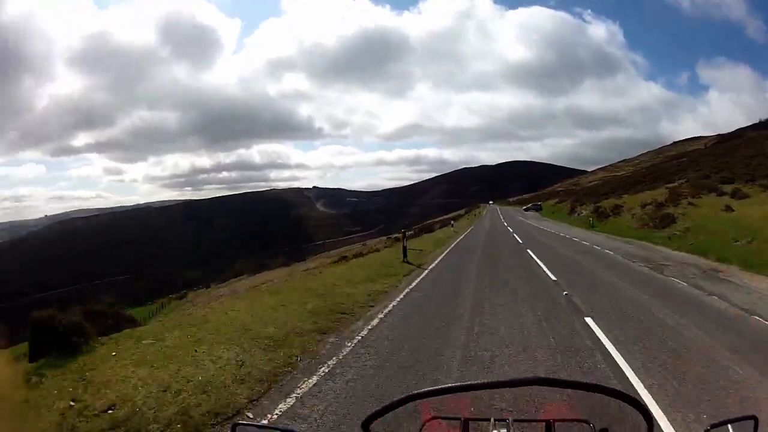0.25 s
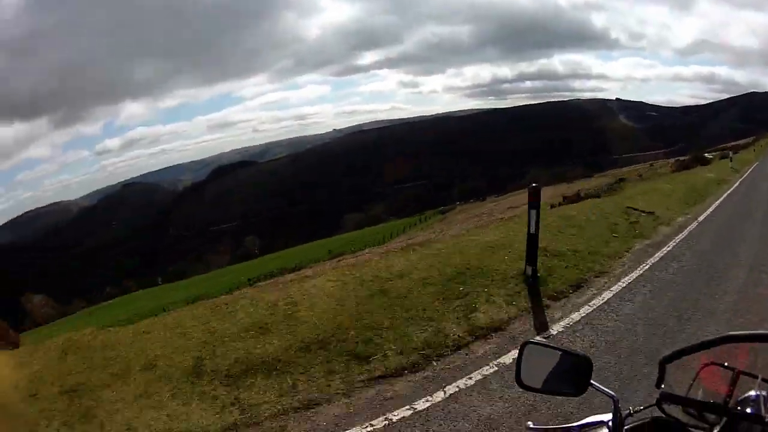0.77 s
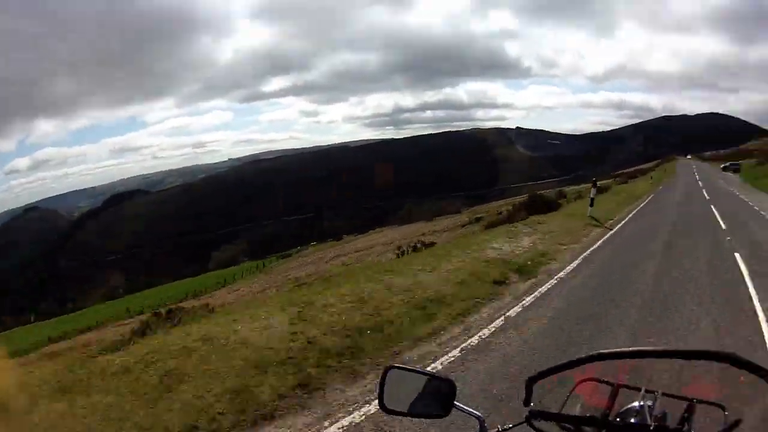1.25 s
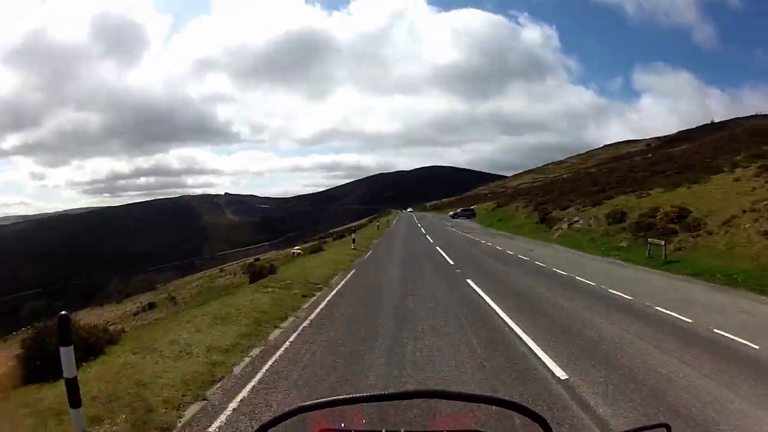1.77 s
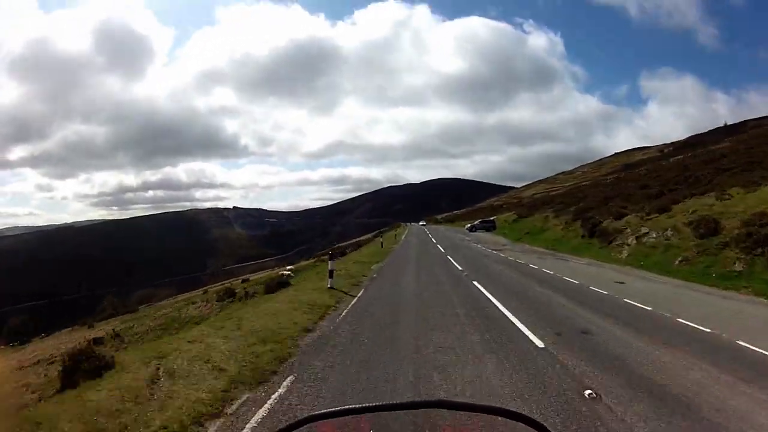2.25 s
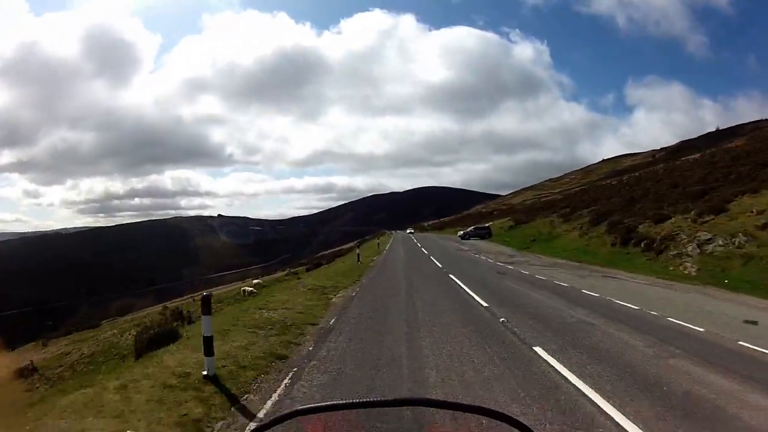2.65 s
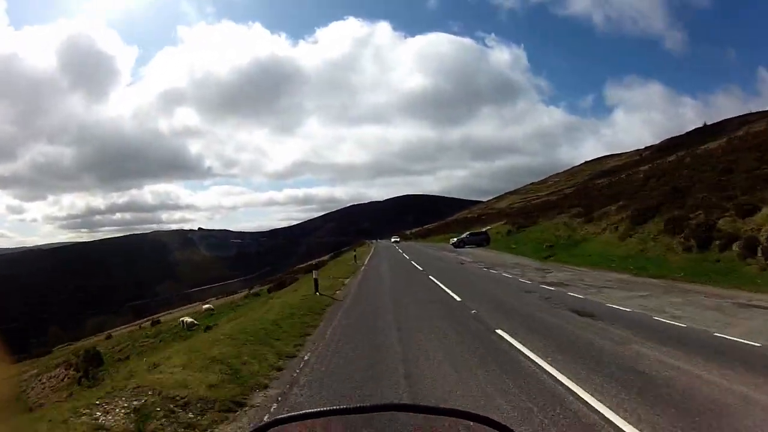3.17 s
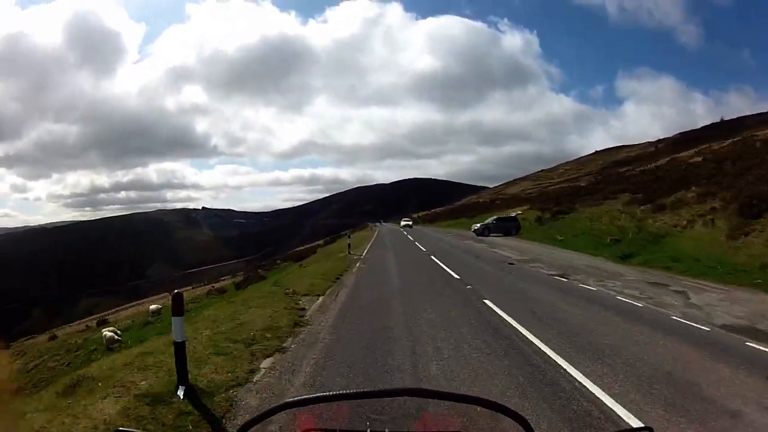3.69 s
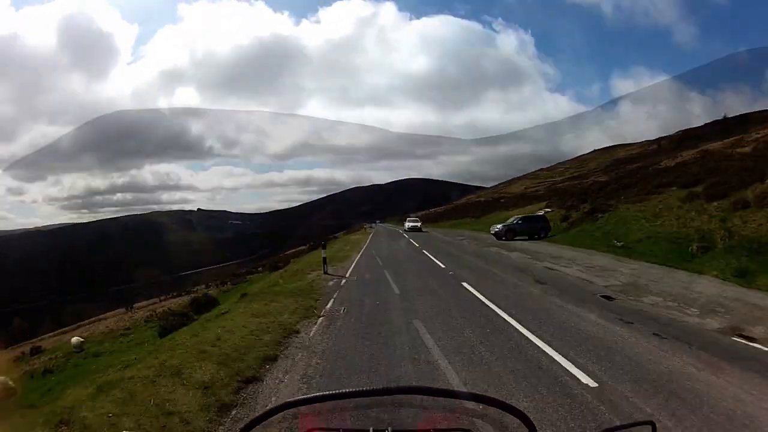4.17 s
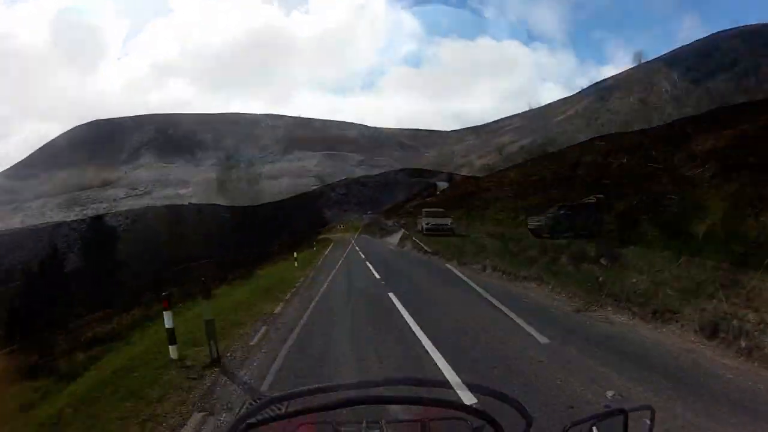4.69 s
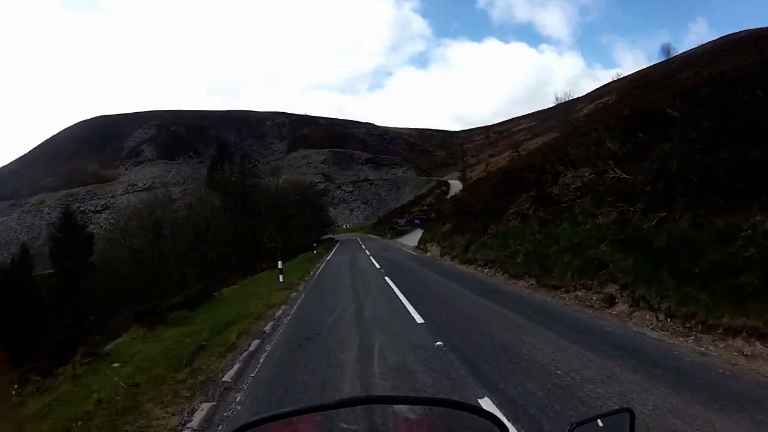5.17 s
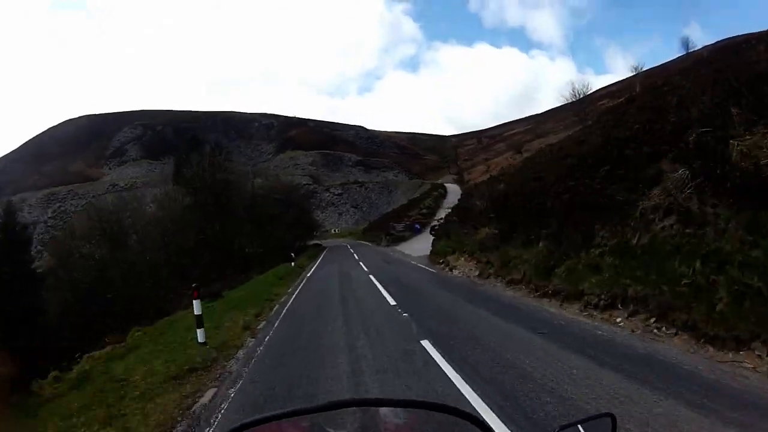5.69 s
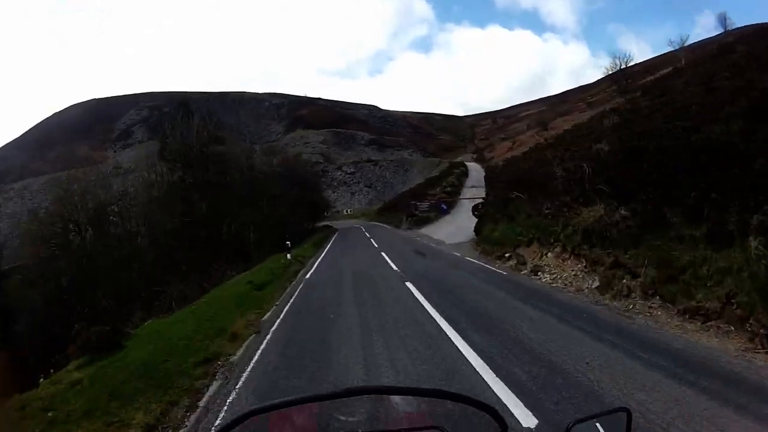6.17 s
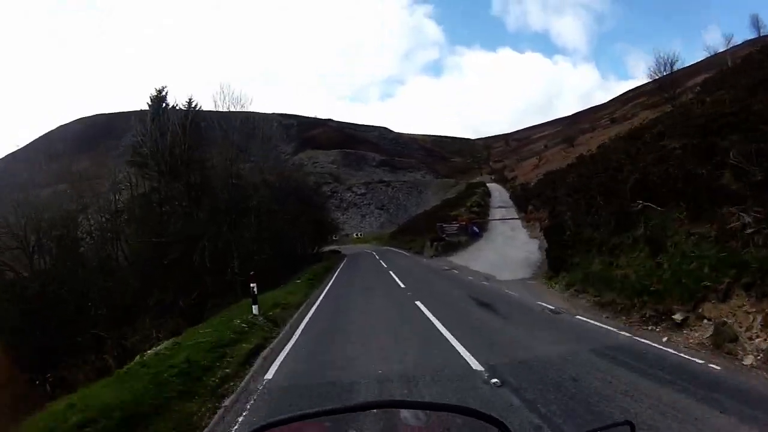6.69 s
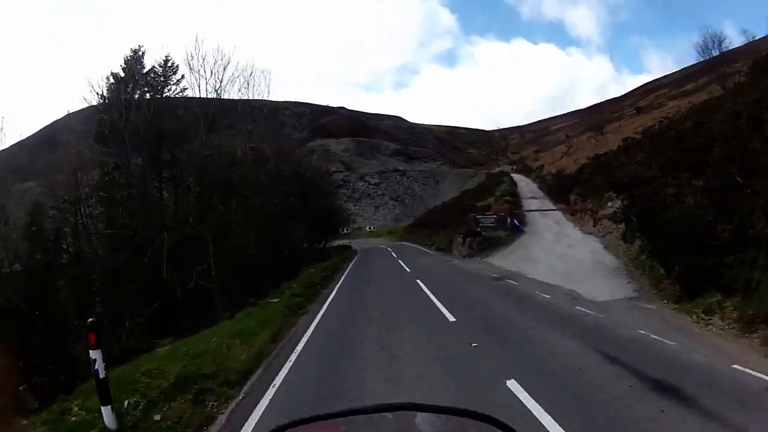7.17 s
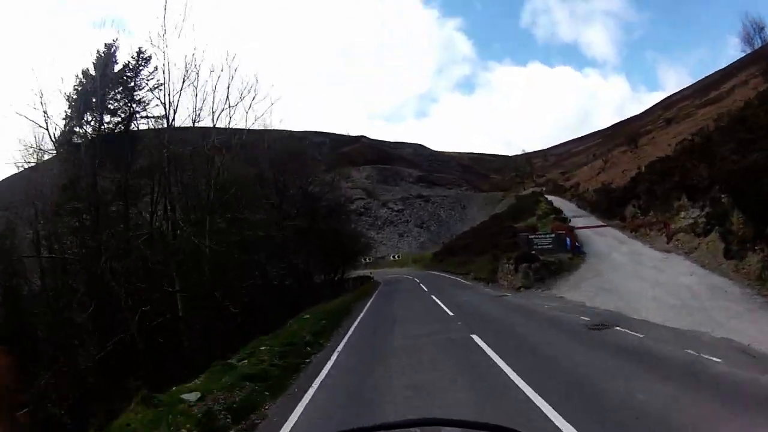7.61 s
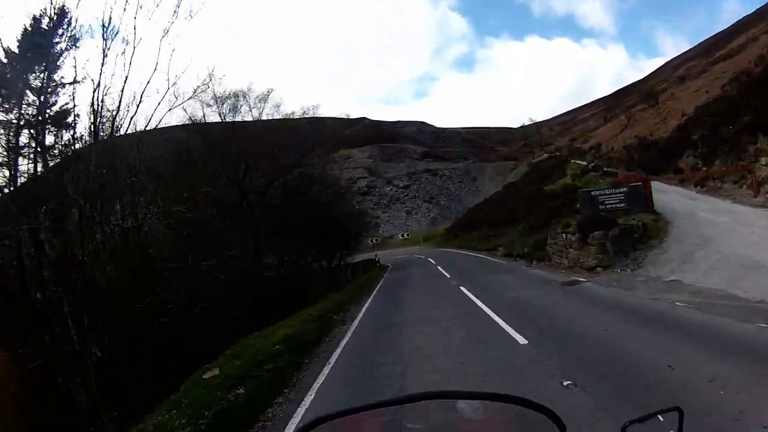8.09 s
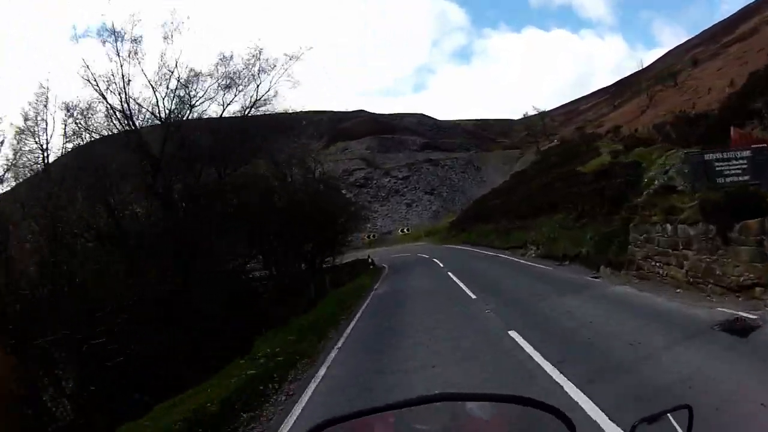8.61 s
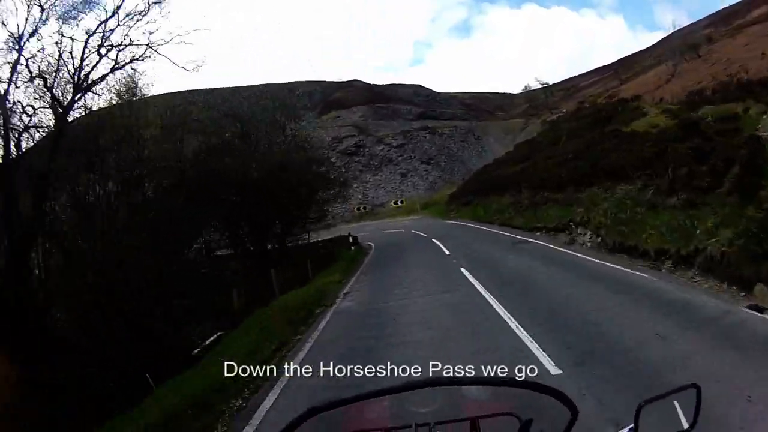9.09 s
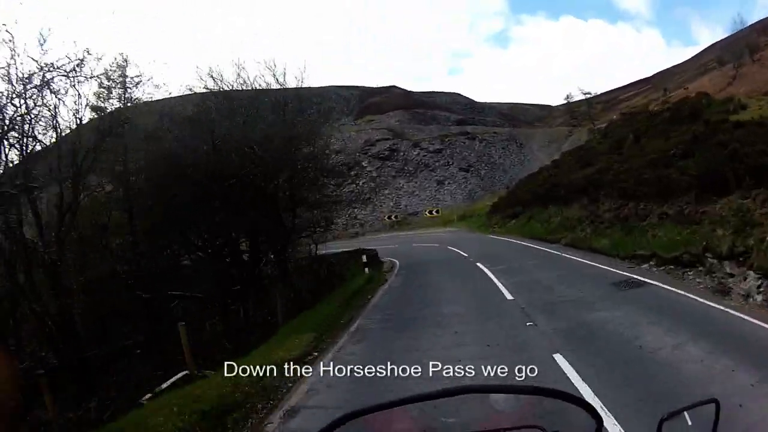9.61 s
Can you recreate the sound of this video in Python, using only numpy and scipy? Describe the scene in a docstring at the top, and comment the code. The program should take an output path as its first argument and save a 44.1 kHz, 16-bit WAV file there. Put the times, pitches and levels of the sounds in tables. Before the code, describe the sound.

Harsh, crackling wind roar over a faint steady motorcycle engine, then a quieter stretch with sparse thuds, falling engine pitch and a late rough drone.

```python
"""Wind buffets the microphone of a small camera on a motorcycle, out on an open road: pressure drives its
amplifier to a rail, where it sticks, and the sound drops out for some ms. Shaped noise makes roar and hiss.
Under it a few engine orders hum as sines on multiples of the shaft rate; late on comes a rough drone.
The camera's electronics leak a thin, pausing whine. A windy and a calm stretch overlap for half a second; short
ticks are steps in voltage. A faint noise, opposite in the two channels, follows the sound's level."""
import sys
import numpy as np
from scipy import signal
from scipy.fft import rfft, irfft
from scipy.io import wavfile

SR = 44100
rng = np.random.default_rng(int(sys.argv[2]) if len(sys.argv) > 2 else 0)


def log_audio(samples):
    """Write samples as a 16-bit WAV file to the path given in sys.argv[1]."""
    # one column per channel
    frames = np.atleast_2d(samples).T
    # limit to full scale, then quantise
    limited = np.clip(frames, -1, 1)
    pcm = np.round(limited * 32767).astype(np.int16)
    wavfile.write(sys.argv[1], SR, pcm)


def makeup_ratio(level_db):
    """Linear amplitude ratio for a level in decibels (20 dB per factor of ten)."""
    decades = np.asarray(level_db, float) / 20
    return 10 ** decades


N = 434385
CALM_STARTS_S, WINDY_ENDS_S = 4.4945, 5.004
RAIL = 1.09  # where the microphone amplifier sticks, before its low cut

# Buffets at set times that pin the microphone amplifier. Each row: start in seconds, hold in ms (ended
# early if another buffet follows sooner), rail (+1 upper, -1 lower).
PINNED = [(0.0073, 13.4, 1), (0.0461, 12.8, -1), (0.1281, 13.2, -1), (0.1644, 13.1, 1), (0.1994, 21.8, -1),
          (0.2227, 24.7, 1), (0.2567, 9.0, -1), (0.3391, 17.1, -1), (0.3862, 7.2, 1), (0.4224, 9.6, 1),
          (0.4662, 9.2, -1), (0.5575, 12.9, 1), (0.5889, 14.0, -1), (0.6059, 10.7, 1), (0.617, 2.0, 1),
          (0.6237, 3.7, 1), (0.632, 12.1, -1), (0.6493, 8.8, -1), (0.6631, 11.9, 1), (0.6757, 7.5, 1),
          (0.6847, 18.4, -1), (0.7043, 13.4, 1), (0.719, 2.2, 1), (0.7232, 3.4, 1), (0.7344, 2.0, 1),
          (0.7443, 2.6, -1), (0.7518, 2.1, -1), (0.7576, 2.0, -1), (0.7778, 5.0, 1), (0.7848, 9.1, -1),
          (0.816, 2.4, 1), (0.8236, 3.6, 1), (0.8685, 9.0, 1), (0.8818, 19.5, -1), (0.9042, 8.0, 1),
          (0.9145, 6.5, 1), (0.9475, 5.5, 1), (1.1015, 12.1, 1), (1.1161, 16.5, -1), (1.1586, 12.5, 1),
          (1.1996, 9.6, 1), (1.2453, 7.6, -1), (1.3449, 10.5, -1), (1.3611, 11.4, 1), (1.3795, 7.3, -1),
          (1.4209, 7.9, 1), (1.4658, 8.3, 1), (1.5213, 13.7, -1), (1.558, 12.7, 1), (1.6011, 11.9, -1),
          (1.6545, 14.5, 1), (1.6707, 17.2, 1), (1.6924, 10.8, -1), (1.7228, 8.8, -1), (1.7548, 8.0, 1),
          (1.7908, 12.0, -1), (1.8071, 7.4, 1), (1.8363, 10.3, 1), (1.8506, 9.7, -1), (1.8759, 9.3, -1),
          (1.8996, 9.7, 1), (1.9261, 20.3, 1), (1.9505, 17.8, -1), (2.0208, 12.9, -1), (2.0472, 10.2, 1),
          (2.0589, 14.6, -1), (2.1537, 13.0, 1), (2.2576, 17.7, -1), (2.2791, 14.1, 1), (2.308, 8.1, -1),
          (2.3333, 15.7, 1), (2.3557, 13.1, -1), (2.3793, 9.5, 1), (2.3955, 12.7, -1), (2.4251, 15.6, 1),
          (2.4468, 17.1, -1), (2.6379, 13.0, -1), (2.6796, 11.6, 1), (2.701, 12.5, -1), (2.8021, 17.3, 1),
          (2.8269, 20.3, -1), (2.8501, 15.0, 1), (2.8737, 10.3, -1), (2.8888, 18.7, 1), (2.911, 18.2, -1),
          (2.9314, 16.4, 1), (2.9602, 8.2, -1), (2.9782, 10.8, 1), (3.0015, 8.5, -1), (3.0359, 7.5, -1),
          (3.0512, 14.1, 1), (3.0807, 9.8, -1), (3.4278, 15.6, -1), (3.5997, 13.8, -1), (3.6168, 14.7, 1),
          (3.763, 7.7, -1), (3.8192, 7.4, 1), (3.8581, 13.9, -1), (3.9283, 8.9, 1), (4.0771, 8.5, 1),
          (4.1244, 16.3, -1), (4.2449, 8.0, -1), (4.3056, 8.6, -1), (5.0585, 7.7, 1), (5.0813, 15.4, -1),
          (6.0368, 9.6, -1), (6.1329, 9.5, 1), (6.1595, 17.6, -1), (6.2811, 7.3, -1), (6.3428, 14.5, -1),
          (6.4162, 7.4, -1), (6.4763, 16.6, -1), (6.7989, 21.6, -1), (7.5964, 10.4, -1), (7.6254, 10.0, 1),
          (7.6581, 13.6, -1), (8.1639, 7.6, -1), (8.9254, 10.8, -1), (9.2419, 8.2, -1), (9.4784, 8.0, -1)]


def all_holds(buffet, from_s, to_s):
    """Brief holds fall by chance between the listed ones, oftener in strong buffeting; rows as in PINNED."""
    spacing_s, rate_per_s, power = 0.024, 30.0, 3.0  # rate at a buffet level of 0 dB, before the clearance
    shortest_ms, longest_ms, clear_ms = 1.8, 5.5, 6.0
    pinned = np.array(PINNED)
    pinned = pinned[(pinned[:, 0] >= from_s) & (pinned[:, 0] < to_s)]
    chance = rng.random((int(N / SR / spacing_s), 4))
    start = (np.arange(len(chance)) + 0.5 * chance[:, 0]) * spacing_s
    hold_ms = shortest_ms + (longest_ms - shortest_ms) * chance[:, 1]
    rail = np.sign(chance[:, 3] - 0.5)
    buffet_db = np.interp(start, *np.transpose(buffet))
    happens = chance[:, 2] < rate_per_s * spacing_s * makeup_ratio(power * buffet_db)
    after = start[:, None] - pinned[:, 0] - (pinned[:, 1] + clear_ms) / 1000 > 0
    before = pinned[:, 0] - start[:, None] - (hold_ms[:, None] + clear_ms) / 1000 > 0
    clear = np.all(after | before, axis=1)
    brief = np.c_[start, hold_ms, rail][happens & clear]
    holds = np.vstack([pinned, brief])
    return holds[np.argsort(holds[:, 0])]


def big_buffets(holds, swing_s, overshoot, edge_s):
    """Pressure that passes a rail for each hold; also the time to the nearest hold, up to swing_s."""
    start, hold_ms, rail = np.transpose(holds)
    following = np.append(start[1:], start[-1] + 1)
    end = np.minimum(start + hold_ms / 1000, following - 0.0008)
    rail = RAIL * np.sign(rail)
    half_gap = np.minimum((following - end) / 2, swing_s)
    # close holds are joined by one swing
    between = (rail + np.roll(rail, -1)) / 2 * (1 - half_gap / swing_s)
    lead = np.roll(half_gap, 1)
    edge_s = np.minimum(edge_s, (end - start) / 2)
    times = np.ravel([start - lead, start, start + edge_s, end - edge_s, end, end + half_gap], "F")
    # the pressure arrives and lets go with a jerk
    crest = overshoot * rail
    pressure = [np.roll(between, 1), 0.83 * rail, crest, crest, 0.85 * rail, between]
    away = [lead, 0 * end, 0 * end, 0 * end, 0 * end, half_gap]
    return [np.interp(np.arange(N) / SR, times, np.ravel(v, "F")) for v in (pressure, away)]


def lesser_buffets(buffet_db, top_hz, nearness):
    """Low noise, softly limited so that it only grazes the rails, fading out towards each hold."""
    small = makeup_ratio(buffet_db) * band_noise([9.0, top_hz])
    return 1.06 * np.tanh(small / 0.83) * np.clip(nearness, 0, 1)


# Low turbulence right at the microphone. Each row: frequency in Hz, relative density in dB per Hz.
ROAR = [(24, 21), (55, 11.5), (100, 10.5), (190, 3), (320, -0.5), (600, -7), (1000, -17.5), (1300, -23.5),
        (1700, -29.5), (2500, -45)]


def wind_roar(roar_db, lumpy_db, flutter):
    """Low-pitched noise whose bands swell separately while shared eddies shake the whole."""
    return makeup_ratio(roar_db + 5.5) * coloured(ROAR, patchy_db=lumpy_db, rate=11.8) * flutter


# Treble of the turbulence at the microphone. Each row: frequency in Hz, relative density in dB per Hz.
HISS = [(2000, 11.5), (3000, 6.5), (3800, 5.5), (5000, 0.5), (9000, -1.5), (11500, -6.5), (14200, -6),
        (15300, -8)]


def wind_hiss(hiss_db, flutter):
    """Treble noise shaken by the same eddies as the roar."""
    return makeup_ratio(hiss_db) * coloured(HISS, patchy_db=1.24, rate=9.0) * flutter


# Band of the rumble under the buffets: lower and upper edge in Hz.
RUMBLE_HZ = 21.0, 105.3


def rumble(level_db):
    """Band noise that follows the strength of the buffets."""
    return makeup_ratio(level_db) * band_noise(RUMBLE_HZ)


# Short swells of the wind noise, some with a brighter hiss. Each row: peak in seconds, roar change in dB,
# hiss change in dB, fade in seconds.
SWELLS = [(4.975, 4.5, 3.5, 0.03), (5.215, 7.5, 4, 0.018), (7.385, -1.5, 8, 0.026), (7.458, 3.5, 4.5, .02),
          (0.621, 10.5, 7.5, 0.015), (0.659, 8, 6, .008), (0.958, 9, 2, 0.012), (8.953, 12, 10, 0.012),
          (9.012, 3.5, 5, 0.017)]


def short_swells():
    """Each swell changes roar and hiss, coming three times as fast as it fades; dB."""
    t = np.arange(N) / SR
    total_db = np.zeros((2, N))
    for s, roar_db, hiss_db, fade_s in SWELLS:
        shape = np.exp(-((t - s) / fade_s * np.where(t < s, 3, 1)) ** 2)
        total_db += np.outer([roar_db, hiss_db], shape)
    return total_db


# Engine at steady throttle. Each row: time in seconds, shaft rate in Hz, level in dB.
CRUISE = [(0.5, 33.0, -32), (1.0, 32.1, -26), (1.3, 32.0, -22), (1.95, 31.55, -25), (2.1, 31.5, -18),
          (3.5, 31.5, -19.5), (5.0, 31.5, -19)]
# Its orders: multiples of the shaft rate, then the level of each in dB on top of the engine's level.
CRUISE_ORDERS = [2.5, 3, 3.5, 4, 6]
CRUISE_ORDERS_DB = [-2, -5, -1.5, -8, 7]


def cruising_engine():
    """Engine orders hum on multiples of a nearly steady shaft rate."""
    shaft_hz, level_db = in_time(CRUISE)
    return makeup_ratio(level_db) * hum(shaft_hz, CRUISE_ORDERS, CRUISE_ORDERS_DB, waver=0.15)


# Engine slowing downhill. Each row: time in seconds, shaft rate in Hz, level of low orders in dB,
# level of high orders in dB.
SLOWING = [(5.2, 31.7, -42, -25), (5.7, 31.3, -40, -25), (6.1, 30.7, -36, -27), (6.35, 30.1, -22, -28),
           (7.2, 29.0, -21, -27), (8.2, 27.9, -21, -28), (8.6, 27.4, -22, -34), (8.9, 27.0, -40, -44)]
# Its orders: multiples of the shaft rate, then the level of each in dB on top of its group's level.
LOW_ORDERS = [1.8, 3, 4.2]
HIGH_ORDERS = [5, 6.5, 8.2]
LOW_ORDERS_DB = [-1.5, 3, -8]
HIGH_ORDERS_DB = [-1, -5, -5.5]


def slowing_engine():
    """Low and high engine orders sink in pitch together with the shaft rate."""
    shaft_hz, low_db, high_db = in_time(SLOWING)
    low = makeup_ratio(low_db) * hum(shaft_hz, LOW_ORDERS, LOW_ORDERS_DB, waver=0.2)
    high = makeup_ratio(high_db) * hum(shaft_hz, HIGH_ORDERS, HIGH_ORDERS_DB, waver=0.2)
    return low + high


# Drone late in the calm stretch. Each row: time in seconds, pitch in Hz, level in dB.
DRONE = [(8.3, 214, -28.5), (8.8, 212, -20.5), (9.1, 202.4, -20), (9.8, 190.5, -25)]
# Band of its rough part: lower and upper edge in Hz.
DRONE_HZ = (168, 230)


def rough_drone():
    """A narrow band of noise around one sine of strongly wavering phase."""
    drone_hz, drone_db = in_time(DRONE)
    rough = makeup_ratio(-2.0) * band_noise(DRONE_HZ)
    return makeup_ratio(drone_db) * (rough + hum(drone_hz, [1], [-7.0], waver=2.5))


def whine(turn):
    """A steady electronic tone, starting turn cycles in, that pauses briefly once per picture field."""
    tone_hz, level_db = 10519.5, -56  # level while on, before the amplifier's low cut
    gaps_per_s, gap_share = 59.94, 0.078
    t = np.arange(N) / SR
    on = (t * gaps_per_s + rng.random()) % 1 > gap_share
    return np.sqrt(2) * makeup_ratio(level_db) * on * np.sin(2 * np.pi * (tone_hz * t + turn))


def stretch(wind, buffet, holds, engine, whine_turn, force):
    """Wind, engine and whine add up at the microphone, whose amplifier clips at its rails."""
    roar_db, hiss_db = in_time(wind) + short_swells()
    buffet_db, = in_time(buffet)
    swing_s, overshoot, buffet_top_hz, rumble_db, lumpy_db = force
    big, away_s = big_buffets(holds, swing_s, overshoot, edge_s=0.002)
    small = lesser_buffets(buffet_db, buffet_top_hz, away_s / swing_s)
    flutter = makeup_ratio(0.77 * drift(27.6))  # eddies shake roar and hiss together
    roar = wind_roar(roar_db, lumpy_db, flutter) + engine + rumble(buffet_db + rumble_db)
    roar *= np.clip(0.35 + away_s / 0.00155, 0, 1)  # a buffet near its crest outweighs the roar
    hiss = wind_hiss(hiss_db, flutter)
    clipped = np.clip(big + small + roar + hiss + whine(whine_turn), -RAIL, RAIL)
    return low_cut(np.diff(clipped, prepend=clipped[0]))


def low_cut(steps):
    """Every step in voltage dies away in about a ms, so that each hold falls silent."""
    cut_hz = 213
    return signal.lfilter([1], [1, -np.exp(-2 * np.pi * cut_hz / SR)], steps)


# Wind at the microphone, strongest while the camera is turned aside. Each row: time in seconds,
# relative roar level in dB, hiss level in dB.
WINDY = [(0.0, -14.5, -49.5), (0.2, -15, -44.5), (0.48, -16, -47), (0.51, -15.5, -39.5), (0.57, -11, -39.5),
         (0.61, -3, -37), (0.7, 0, -38), (0.8, -10.5, -39), (0.9, -12, -38), (1.3, -12.5, -38),
         (1.45, -17, -43.5), (1.6, -10, -45), (2.8, -15.5, -47), (4.4, -15.5, -46.5), (4.9, -14, -47)]
# Lesser buffets between the holds. Each row: time in seconds, strength in dB before soft limiting.
WINDY_BUFFET = [(0, -3.5), (0.8, 0.5), (1.3, -0.5), (2.0, -2), (3.2, -4), (4.3, -7.5), (5, -3.5)]
# How hard the wind hits. One row: swing to the rail in seconds, overshoot in rails, top of the buffet band
# in Hz, rumble relative to buffet in dB, lumpiness of the roar in dB.
WINDY_FORCE = (0.03, 3.0, 45.5, -8.5, 2)


def windy_stretch():
    """Hard, quick buffets over an engine at steady throttle."""
    holds = all_holds(WINDY_BUFFET, 0, CALM_STARTS_S)
    return stretch(WINDY, WINDY_BUFFET, holds, cruising_engine(), whine_turn=0, force=WINDY_FORCE)


# Weaker wind at the microphone. Each row: time in seconds, relative roar level in dB, hiss level in dB.
CALM = [(5.05, -18, -52.5), (5.45, -20, -53.5), (6.4, -19, -51), (7.05, -19.5, -52), (7.4, -20.5, -51.5),
        (7.62, -17.5, -51), (7.85, -20.5, -51.5), (8.4, -21, -50), (8.8, -21.5, -52.5), (9.45, -23, -53.5),
        (9.85, -21.5, -52)]
# Lesser buffets between the holds. Each row: time in seconds, strength in dB before soft limiting.
CALM_BUFFET = [(4.5, -2), (5.1, -9.5), (5.5, -14.5), (6.4, -3), (7.0, -10), (9.0, -9.5)]
# How hard the wind hits. One row: swing to the rail in seconds, overshoot in rails, top of the buffet band
# in Hz, rumble relative to buffet in dB, lumpiness of the roar in dB.
CALM_FORCE = (0.15, 1.5, 28, -21, 1.0)


def calm_stretch():
    """Sparser, slower buffets over a slowing engine and a late drone."""
    holds = all_holds(CALM_BUFFET, CALM_STARTS_S, N / SR)
    engine = slowing_engine() + rough_drone()
    return stretch(CALM, CALM_BUFFET, holds, engine, whine_turn=0.41, force=CALM_FORCE)


# Short clicks, two near the joins of the windy and calm stretches. Each row: time in seconds, step as a share
# of full scale.
TICKS = [(4.4943, 0.25), (5.003, 0.15), (5.4946, -0.097)]


def ticks():
    """Single steps in voltage that die away like the edges of a hold."""
    steps = np.zeros(N)
    for s, step in TICKS:
        steps[round(s * SR)] = step
    return low_cut(steps)


# Faint noise that follows the sound's level. Each row: frequency in Hz, level relative to the sound in dB
# before 1 dB of gain and its coming and going.
FAINT_NOISE = [(60, -35.5), (380, -38.5), (2380, -18), (4500, -10.5), (15000, -12)]


def faint_noise(sound):
    """The sound, tilted to the treble, times fast random drift: noise that follows its level."""
    hz, db = np.transpose(FAINT_NOISE)
    tilt = makeup_ratio(np.interp(log_frequencies(), np.log(hz), db))
    present = np.clip(0.5 + 1.3 * drift(11.0), 0, 1)
    return makeup_ratio(1.0) * irfft(rfft(sound) * tilt, N) * drift(58.0) * present


def hum(shaft_hz, orders, orders_db, waver):
    """Sines on multiples of the shaft rate, each wavering in level and in phase (waver in radians)."""
    turn = 2 * np.pi * np.cumsum(shaft_hz) / SR
    total = np.zeros(N)
    for order, db in zip(orders, orders_db):
        level = np.sqrt(2) * makeup_ratio(db + 0.9 * drift(3.0))
        total += level * np.sin(order * turn + 7.0 * rng.random() + waver * drift(3.0))
    return total


def coloured(spectrum, patchy_db, rate):
    """Noise of a given colour whose overlapping bands swell and sink each on its own; rms 1."""
    hz, db = np.transpose(spectrum)
    grid = log_frequencies()
    colour = makeup_ratio(np.interp(grid, np.log(hz), db, left=-200, right=-200))
    whole = rfft(rng.standard_normal(N)) * colour
    centres = np.log(hz[1::2])
    total = np.zeros(N)
    for share in np.eye(len(centres)):
        band = irfft(whole * np.interp(grid, centres, share), N)
        total += band * makeup_ratio(patchy_db * drift(rate))
    return rms_one(total)


def band_noise(edges_hz):
    """Noise between two edges; rms 1."""
    band = signal.butter(2, edges_hz, "band", fs=SR, output="sos")
    return rms_one(signal.sosfilt(band, rng.standard_normal(N)))


def drift(rate):
    """Slow chance of spread 1: noise through two equal low-pass poles at rate Hz."""
    every = 40  # samples per drawn point
    r = np.exp(-2 * np.pi * rate * every / SR)
    slow = signal.lfilter([1], [1, -2 * r, r * r], rng.standard_normal(N // every + 2002))[2000:]
    return np.interp(np.arange(N) / every, np.arange(len(slow)), rms_one(slow - slow.mean()))


def log_frequencies():
    """Natural logarithm of each spectrum bin's frequency, counted from one bin up."""
    return np.log(np.arange(1, N // 2 + 2) * SR / N)


def in_time(rows):
    """Columns of a table, one value per sample."""
    s, *columns = np.transpose(rows)
    return [np.interp(np.arange(N) / SR, s, c) for c in columns]


def rms_one(x):
    """Scale to rms 1."""
    return x / np.sqrt(np.mean(x ** 2) + 1e-20)


def scene():
    """The calm stretch cuts in before the windy one cuts out; one microphone feeds both channels."""
    t = np.arange(N) / SR
    fade_out = np.clip((WINDY_ENDS_S - t) / 0.003, 0, 1)
    fade_in = np.clip((t - CALM_STARTS_S) / 0.003, 0, 1)
    mono = windy_stretch() * fade_out + calm_stretch() * fade_in + ticks()
    return np.tile(mono, (2, 1))


def low_pass(x):
    """Removes everything above the highest recorded frequency."""
    return signal.sosfilt(signal.butter(12, 15560, fs=SR, output="sos"), x)


def record(dry):
    """Full scale clips, faint noise enters the channels with opposite sign, and the top is cut."""
    full = np.clip(dry, -1, 1)
    full = full + faint_noise(full[0]) * [[1], [-1]]
    top_cut = signal.cheby2(12, 60, 15400, fs=SR, output="sos")  # 60 dB down from 15400 Hz
    mix = signal.sosfilt(top_cut, full)
    return low_pass(mix)


dry = scene()
out = record(dry)
log_audio(out)
```